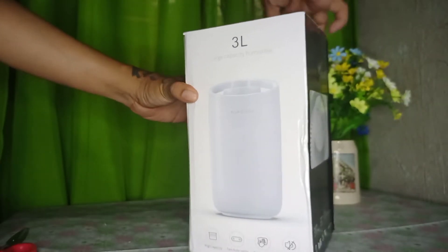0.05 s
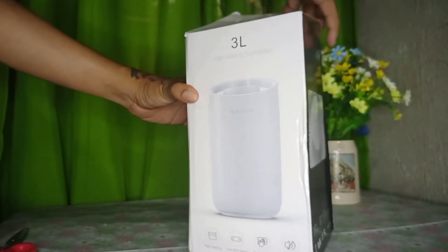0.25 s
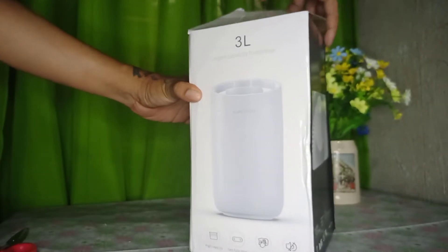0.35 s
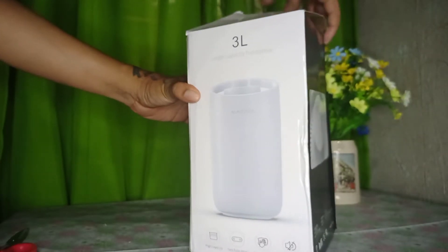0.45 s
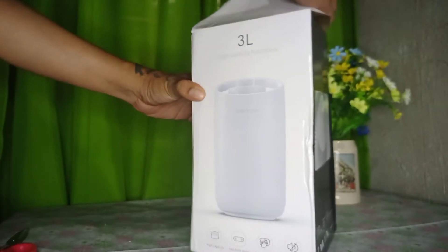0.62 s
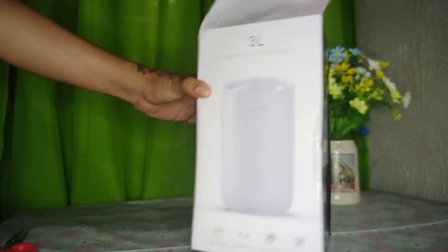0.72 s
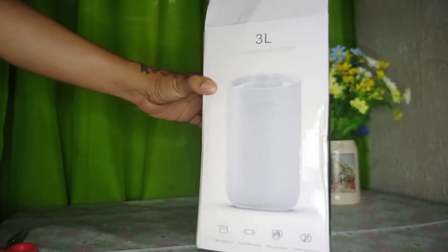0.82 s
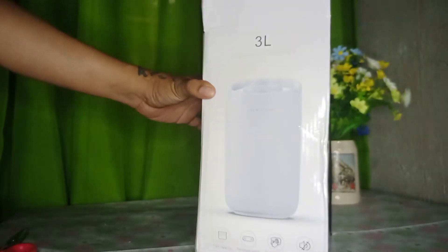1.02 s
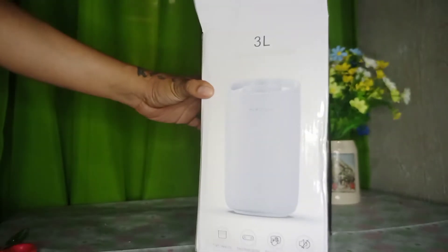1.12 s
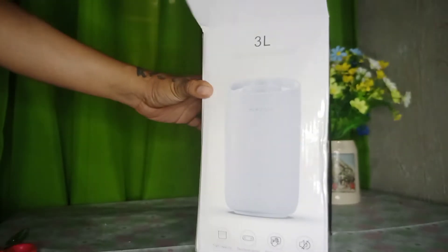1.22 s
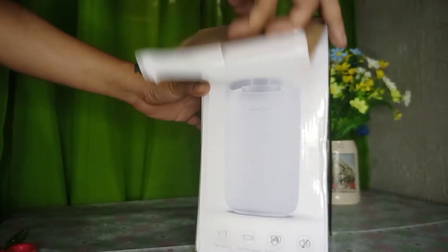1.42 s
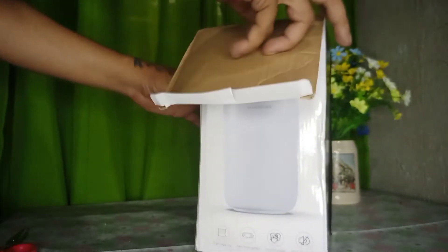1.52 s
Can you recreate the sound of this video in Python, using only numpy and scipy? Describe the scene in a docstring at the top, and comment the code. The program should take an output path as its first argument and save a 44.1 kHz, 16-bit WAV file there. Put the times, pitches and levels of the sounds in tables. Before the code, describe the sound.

Close-miked cardboard carton in a small reflective room; quiet fingertip taps, one loud knock on the table top, a flap scraping free with a thud, a cluster of cracks, then smaller clicks and light rustles.

```python
"""A cardboard carton is opened on a table in a small, hard-walled room. The box knocks on the
table top and excites the damped modes of both; freed panels thud as single damped modes.
Decaying bands of noise crack, tick or dull a knock; fingertips tap out short sets of modes.
Tabs scrape, the lid brushes and fingers rub, all as trains of stick-slip grains.
A low rumble of flexing walls, quiet room tone and faint recorder hiss lie underneath."""
import sys
import numpy as np
from scipy import signal
from scipy.fft import rfft, irfft
from scipy.io import wavfile

SR = 44100
rng = np.random.default_rng(int(sys.argv[2]) if len(sys.argv) > 2 else 0)


def master(y):
    """Save y as 16-bit WAV."""
    cut = np.clip(np.atleast_2d(y).T, -1, 1)
    pcm = np.round(cut * 32767)  # scale
    wavfile.write(sys.argv[1], SR, pcm.astype(np.int16))


N = 68355  # length in samples
EDGE_HZ = 8250  # upper band limit of the noise bursts and of the microphone

# The box meets the table. Each row: start in seconds, level in dB,
# extra level in dB of the box modes above 600 Hz.
KNOCKS = [(0.2293, -24, 7), (0.2329, -17, -2.5), (0.2517, -45, 5.5)]
# Short modes of the box. Each row: frequency in Hz, relative level in dB, T60 in seconds.
BOX_MODES = [(273, 4.5, 0.032), (347, 1, 0.029), (454, 2, 0.013), (540, -26, .025), (812, 5.5, 0.017),
             (980, -2.5, 0.065), (1318, -12.5, 0.057), (1485, -10.5, 0.047)]
# Long modes of the table top. Each row: frequency in Hz, relative level in dB, T60 in seconds.
TABLE_MODES = [(142, -9, .36), (186, -17, .3), (202, -3.5, .38), (226, -17, .25), (257, -17, .42),
               (415, -15, .25), (473, -23, .3), (810, -25, .28), (1006, -24, .22), (1218, -27, .25),
               (1342, -31, .3)]
TABLE_DB = -7  # table relative to box
KNOCK_RISE_S, KNOCK_ROOM_DB = 0.0023, -7.5


def knocks():
    """Modal excitation by impact: the edge lands twice and bounces once; the table hums on."""
    out = np.zeros(N)
    for start_s, db, bright_db in KNOCKS:
        box = 0
        for hz, mode_db, t60 in BOX_MODES:
            extra_db = bright_db * (hz > 600)
            box = box + amp(mode_db + extra_db) * ring(hz, t60, KNOCK_RISE_S)
        table = 0
        for hz, mode_db, t60 in TABLE_MODES:
            table = table + amp(mode_db) * ring(hz, t60, KNOCK_RISE_S)
        add(out, start_s, amp(db) * (box + amp(TABLE_DB) * table))
    return in_room(out, KNOCK_ROOM_DB)


# A panel springs back. Each row: start in seconds, level in dB, pitch in Hz, T60 in seconds.
THUDS = [(.184, -49.5, 232, 0.048), (0.242, -51.5, 66, .15), (0.391, -49.5, 211, 0.1), (.474, -49, 237, .1),
         (0.621, -54.5, 126, 0.46), (0.677, -53, 105, 0.49), (.715, -50, 277, 0.094),
         (.738, -43, 212, 0.066), (.798, -39, 101.7, 0.15), (0.8063, -23, 267, 0.025),
         (0.8099, -17, 263.4, 0.02), (0.848, -50, 277, 0.065), (0.87, -46, 86.5, .12),
         (0.93, -37.5, 234, 0.065), (0.959, -47.5, 89, 0.11), (1.015, -45.5, 247, 0.04),
         (1.047, -41.5, 144, .15), (1.1402, -30.5, 287, 0.045), (1.148, -37, 117.3, 0.077),
         (1.324, -47.5, 158.6, 0.18), (1.353, -30.5, 204, 0.026), (1.382, -49, 193, 0.049),
         (1.506, -46.5, 62.6, 0.13), (1.507, -50, 350, 0.041)]
THUD_RISE_S, THUD_ROOM_DB = 0.0011, -13.5


def thuds():
    """Damped free vibration: a released panel swings at its own pitch and dies away."""
    out = np.zeros(N)
    for start_s, db, hz, t60 in THUDS:
        add(out, start_s, amp(db) * ring(hz, t60, THUD_RISE_S))
    return in_room(out, THUD_ROOM_DB)


# Sharp cracks and ticks of card, and the dull noisy part of some knocks and taps.
# Each row: start in seconds, level in dB, centre frequency in Hz, half width in octaves,
# T60 in seconds.
NOISE_BURSTS = [(.189, -59, 2700, 0.44, 0.019), (0.2287, -36, 3180, 0.8, 0.1), (0.245, -32, 3750, 1, 0.012),
                (.326, -45, 1175, .2, 0.041), (.455, -48.5, 5100, 0.56, 0.019),
                (0.4653, -50, 5800, 0.13, 0.015), (.535, -45.5, 1740, 0.42, 0.016),
                (.563, -61, 2900, 0.15, 0.045), (0.63, -47.5, 6430, 0.083, .014),
                (0.629, -55, 2480, 0.83, 0.041), (0.74, -36.5, 3420, 0.46, 0.023),
                (.805, -32, 2520, 1, 0.031), (.807, -33, 1170, 0.17, 0.025),
                (1.1405, -32, 620, 0.76, 0.026), (0.809, -30, 5160, 0.3, 0.0098),
                (0.873, -45, 964, 0.25, 0.028), (1.014, -37.5, 3240, 0.6, 0.012),
                (1.042, -43, 4080, 0.36, 0.019), (1.052, -46, 3400, 0.56, 0.016),
                (1.076, -35.5, 2290, 0.19, 0.013), (1.076, -38.5, 6200, .3, 0.009),
                (1.117, -43, 2920, 0.57, 0.022), (1.129, -35, 4470, 1, 0.027),
                (1.1338, -30.5, 4980, 0.35, 0.026), (1.1345, -31.5, 2900, 0.71, 0.014),
                (1.3135, -29, 4020, 0.3, 0.0098), (1.3128, -35, 2335, 0.068, 0.016),
                (1.3128, -38.5, 7270, 0.6, 0.017), (1.345, -44, 2130, 0.65, 0.03),
                (1.5, -55, 2480, 0.32, 0.036)]
BURST_RISE_S, BURST_ROOM_DB = 0.00075, -6.5


def noise_bursts():
    """Transient band noise: sharp cracks and ticks, and the dull noisy part of knocks and taps."""
    size = 4096
    t = np.arange(size) / SR
    hz = np.fft.rfftfreq(size, 1 / SR)
    noises = rng.standard_normal((len(NOISE_BURSTS), size))
    out = np.zeros(N)
    for (start_s, db, centre_hz, half_octaves, t60), noise in zip(NOISE_BURSTS, noises):
        octaves_off = np.log2((hz + 1) / centre_hz)
        band = 1 / (1 + (octaves_off / half_octaves) ** 2) * (hz < EDGE_HZ)
        shape = (1 - np.exp(-t / BURST_RISE_S)) * np.exp(-np.log(1000) * t / t60)
        burst = irfft(rfft(noise) * band) * shape
        # the burst gets the energy of its envelope, whatever its bandwidth
        burst = burst * np.linalg.norm(shape) / np.linalg.norm(burst)
        add(out, start_s, amp(db) * burst)
    return in_room(out, BURST_ROOM_DB)


# Fingertips tap a panel. Each row: start in seconds, level in dB, pitch in Hz.
TAPS = [(.0265, -41, 978), (.041, -47.5, 940), (.187, -38.5, 908), (.211, -53, 862), (.254, -30.5, 843),
        (.327, -46.5, 867), (.476, -45.5, 797), (.536, -45, 853), (.565, -40.5, 863), (.655, -48.5, 964),
        (.713, -40.5, 924), (.807, -29.5, 810), (.874, -42.5, 872), (.959, -41, 957), (1.014, -46, 934),
        (1.077, -39, 850), (1.141, -39, 792), (1.315, -39.5, 882), (1.502, -59.5, 950)]
# Modes of a tap. Each row: multiple of the pitch, relative level in dB, T60 in seconds.
TAP_MODES = [(.7, -11.5, 0.024), (1, 2, 0.03), (1.14, -10.5, 0.022), (1.36, -11, .022),
             (1.75, -22.5, 0.007), (2.5, -12, 0.012), (3.3, -22, 0.032)]
TAP_RISE_S, TAP_ROOM_DB = 0.0014, -4.5


def taps():
    """Inharmonic plate modes: hollow taps, whose pitch depends on the spot that is touched."""
    out = np.zeros(N)
    for start_s, db, hz in TAPS:
        for multiple, mode_db, t60 in TAP_MODES:
            add(out, start_s, amp(db + mode_db) * ring(hz * multiple, t60, TAP_RISE_S))
    return in_room(out, TAP_ROOM_DB)


def friction(strokes, colour, grains_per_s, spread_db, edge_s):
    """Stick-slip friction: random grains of uneven size under each stroke, coloured by the card."""
    t = np.arange(N) / SR
    happens = rng.random(N) < grains_per_s / SR
    sign = rng.choice([-1., 1.], N)
    size = amp(spread_db * np.minimum(rng.exponential(1, N), 3))
    slips = happens * sign * size
    level = np.zeros(N)
    for start_s, length_s, db, swell_db in strokes:
        fade_in = np.clip((t - start_s) / edge_s, 0, 1)
        fade_out = np.clip((start_s + length_s - t) / edge_s + 1, 0, 1)  # begins at the stroke's end
        progress = np.clip((t - start_s) / length_s, 0, 1)
        level += fade_in * fade_out * amp(db + swell_db * (progress - 1))
    return level * coloured(slips, colour)


# Card slides along card. Each row: start in seconds, length in seconds,
# level at the end in dB, swell over the stroke in dB.
SCRAPES = [(.531, 0.039, -80, -10), (.725, 0.016, -50.5, 3.5), (.777, .031, -34.5, 16),
           (.925, 0.043, -47, 17), (.965, .022, -59.5, -4.5), (1.114, 0.0238, -39.5, 12),
           (1.306, 0.0074, -52.5, 13), (1.317, 0.0394, -56.5, 1.5), (1.356, 0.016, -68, -7),
           (1.50, 0.023, -63, 0)]
# Spectrum of the scrapes. Each row: frequency in Hz, relative spectral level in dB.
SCRAPE_COLOUR = [(200, -22), (500, -5), (850, 2.5), (1300, -3), (1700, -5), (2200, 0.5), (3400, -3),
                 (5000, -6), (7000, -7), (8500, -28.5)]
SCRAPE_GRAINS_PER_S, SCRAPE_SPREAD_DB, SCRAPE_ROOM_DB = 2000, 3, -7.5


def scrapes():
    """Stick-slip between card edges: tabs slide out of their slots in dense grains."""
    dry_scrapes = friction(SCRAPES, SCRAPE_COLOUR, SCRAPE_GRAINS_PER_S, SCRAPE_SPREAD_DB, edge_s=0.0017)
    return in_room(dry_scrapes, SCRAPE_ROOM_DB)


# Fingers drag over a panel. Each row: start in seconds, length in seconds,
# level at the end in dB, swell over the stroke in dB.
RUBS = [(.021, 0.014, -60, 6.5), (.05, 0.11, -84, -4), (.158, 0.032, -64, 13.5), (.18, 0.096, -53, 4),
        (.26, 0.11, -55, -8.5), (.36, 0.145, -65, -3), (.53, 0.039, -55, 5), (.575, 0.036, -79.5, -26),
        (.652, 0.12, -61.5, -3)]
# Spectrum of the rubs. Each row: frequency in Hz, relative spectral level in dB.
RUB_COLOUR = [(200, -9), (400, -29), (620, -6), (850, -1.5), (1300, -6.5), (1550, -11), (1800, -27.5),
              (2900, -20.5), (4800, -31.5), (8000, -36.5)]
RUB_GRAINS_PER_S, RUB_SPREAD_DB, RUB_ROOM_DB = 1500, -1.5, -5


def rubs():
    """Stick-slip of skin on card: fingers drag over a panel in strokes with softer edges."""
    dry_rubs = friction(RUBS, RUB_COLOUR, RUB_GRAINS_PER_S, RUB_SPREAD_DB, edge_s=0.0055)
    return in_room(dry_rubs, RUB_ROOM_DB)


# The swinging lid brushes the side flaps. Each row: start in seconds, length in seconds,
# level at the end in dB, swell over the stroke in dB.
BRUSHES = [(1.18, 0.067, -69, -7), (1.405, 0.06, -67.5, 1), (1.46, 0.023, -65.5, -2)]
# Spectrum of the brushes. Each row: frequency in Hz, relative spectral level in dB.
BRUSH_COLOUR = [(300, -18), (1200, -14), (1600, -0.5), (1900, -12), (2300, 4.5), (3200, -1.5), (4600, 0),
                (6500, -2.5), (8000, -15.5)]
BRUSH_GRAINS_PER_S, BRUSH_SPREAD_DB, BRUSH_ROOM_DB = 900, 0.5, -5.5


def brushes():
    """Stick-slip under light contact: the lid grazes the flaps in sparser grains."""
    dry_brushes = friction(BRUSHES, BRUSH_COLOUR, BRUSH_GRAINS_PER_S, BRUSH_SPREAD_DB, edge_s=0.0095)
    return in_room(dry_brushes, BRUSH_ROOM_DB)


# The carton flexes in the hand. Each row: time in seconds, level in dB.
FLEX = [(0, -85), (0.169, -81), (0.241, -50.5), (.42, -58), (.6, -64.5), (.72, -65), (.78, -51),
        (0.871, -45.5), (.92, -52.5), (1.0, -59), (1.161, -57.5), (1.249, -77.5), (1.47, -86),
        (1.55, -63.5)]
# Spectrum of the flexing. Each row: frequency in Hz, relative spectral level in dB.
FLEX_COLOUR = [(20, -21.5), (45, -3.5), (70, -1.5), (110, -1.5), (170, -3.5), (260, -1), (380, -16.5),
               (700, -37.5), (2000, -52.5)]


def flexing():
    """Forced bending: walls under the grip give a low noise rumble of varying level."""
    times_s, levels_db = np.transpose(FLEX)
    level = amp(np.interp(np.arange(N) / SR, times_s, levels_db))
    return level * coloured(rng.standard_normal(N), FLEX_COLOUR)


# Spectrum of the room tone. Each row: frequency in Hz, relative spectral level in dB.
FLOOR_COLOUR = [(20, -2), (80, 1.5), (180, -10), (350, 1.5), (600, -8.5), (1100, -7.5), (1700, -20.5),
                (4000, -22), (8000, -26.5)]
FLOOR_DB = -76.5


def room_tone():
    """Stationary noise: a steady, quiet, coloured background."""
    return amp(FLOOR_DB) * coloured(rng.standard_normal(N), FLOOR_COLOUR)


# Decay of the room. Each row: frequency in Hz, T60 in seconds.
ROOM_T60 = [(100, 0.2), (250, 0.44), (600, 0.12), (1100, 0.29), (1900, 0.27), (3200, 0.34), (6500, 0.36)]
# Spectrum of the reflections. Each row: frequency in Hz, gain in dB.
ROOM_COLOUR = [(60, -2), (200, -0.5), (330, 3.5), (500, 2), (1000, -6.5), (1800, 1), (3000, -3),
               (6500, -1.5)]
ROOM_DELAY_S = .005


def in_room(x, wet_db):
    """Reverberation: adds a tail of sparse reflections, each band dying at its own speed."""
    count, spacing = 1400, 20  # one echo at a random place in every 20 samples
    places = np.arange(count) * spacing + rng.integers(0, spacing, count)
    echoes = np.zeros(SR)
    echoes[places] = rng.choice([-1., 1.], count)
    hz, t, bands = signal.stft(echoes, SR, nperseg=256)
    decay = np.exp(-np.log(1000) * t / read(ROOM_T60, hz)[:, None])
    tail = signal.istft(bands * decay, SR, nperseg=256)[1]
    tail = filtered(tail / np.linalg.norm(tail), ROOM_COLOUR)
    out = x.copy()
    add(out, ROOM_DELAY_S, amp(wet_db) * signal.fftconvolve(x, tail))
    return out


def ring(hz, t60, rise_s):
    """Damped oscillation: one mode with a soft start and an exponential decay."""
    t = np.arange(SR // 2) / SR
    decay = np.exp(-np.log(1000) * t / t60)
    return (1 - np.exp(-t / rise_s)) * decay * np.sin(2 * np.pi * hz * t)


def coloured(x, colour):
    """Spectral shaping: gives a signal a spectrum, at an rms of one."""
    gain = amp(read(colour, np.fft.rfftfreq(len(x), 1 / SR)))
    return unit(irfft(rfft(x) * gain, len(x)))


def filtered(x, colour):
    """Minimum-phase filtering: a causal filter whose phase follows from its log gain."""
    size = 4096
    log_gain = np.log(amp(read(colour, abs(np.fft.fftfreq(size, 1 / SR)))))
    response = np.fft.ifft(np.exp(np.conj(signal.hilbert(log_gain)))).real
    return signal.fftconvolve(x, response[:size // 2])[:len(x)]


def amp(db):
    """Logarithmic level: decibels to gain."""
    return 10 ** (np.asarray(db) / 20)


def unit(x):
    """Rms normalization: scales a signal to an rms of one."""
    return x / np.sqrt(np.mean(x ** 2) + 1e-20)


def read(points, hz):
    """Logarithmic frequency scale: interpolates a table along it."""
    f, value = np.transpose(points)
    return np.interp(np.log(hz + 1), np.log(f + 1), value)


def add(mix, start_s, sound):
    """Superposition: mixes a sound in at a time, cut off at the end of the mix."""
    part = mix[max(round(start_s * SR), 0):][:len(sound)]
    part += sound[:len(part)]


def scene():
    """Superposition of all the handling sounds over quiet room tone."""
    impacts = knocks() + thuds() + noise_bursts() + taps()
    sliding = scrapes() + rubs() + brushes()
    return (impacts + sliding + flexing() + room_tone())[None]


# Response of the microphone. Each row: frequency in Hz, gain in dB.
MIC_COLOUR = [(15, -27.5), (30, -17.5), (50, -5.5), (70, 0), (7000, 1.5), (7600, -4.5), (8300, -14.5)]
HISS_DB = -97


def record(dry):
    """Band limiting: bass roll-off and a steep upper edge, then faint hiss that reaches above it."""
    band_limit = signal.firwin(201, EDGE_HZ, window=("kaiser", 7), fs=SR)
    limited = signal.oaconvolve(filtered(dry[0], MIC_COLOUR), band_limit, "same")
    hissy = limited + amp(HISS_DB) * rng.standard_normal(N)
    hiss_limit = signal.firwin(255, 15500, window=("kaiser", 8), fs=SR)
    return signal.oaconvolve(hissy, hiss_limit, "same")[None]


dry = scene()
out = record(dry)
master(out)
```